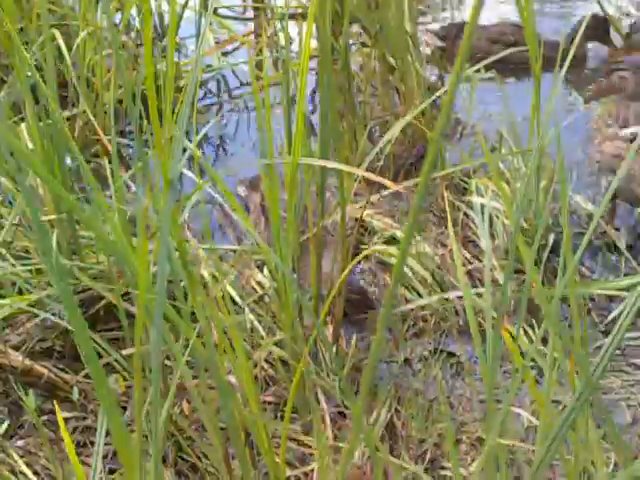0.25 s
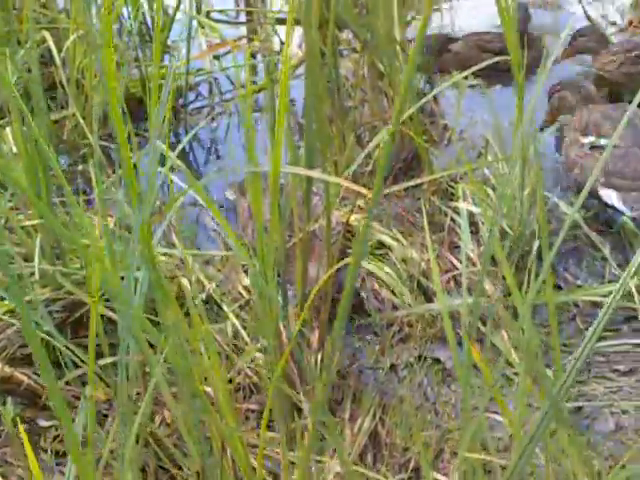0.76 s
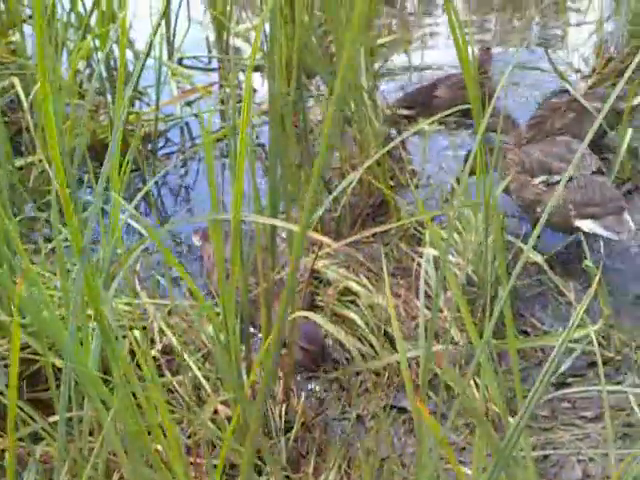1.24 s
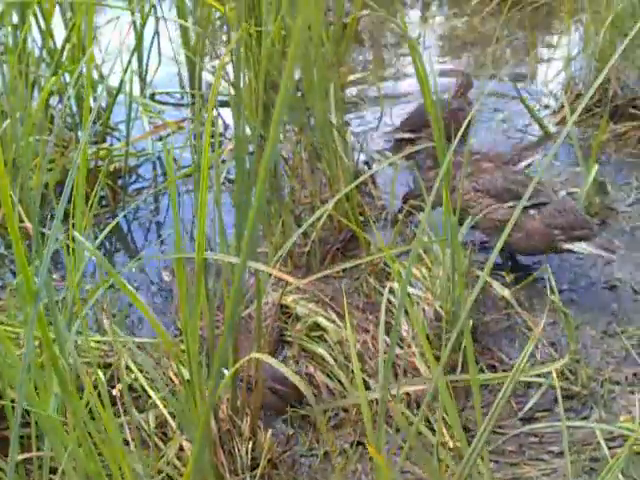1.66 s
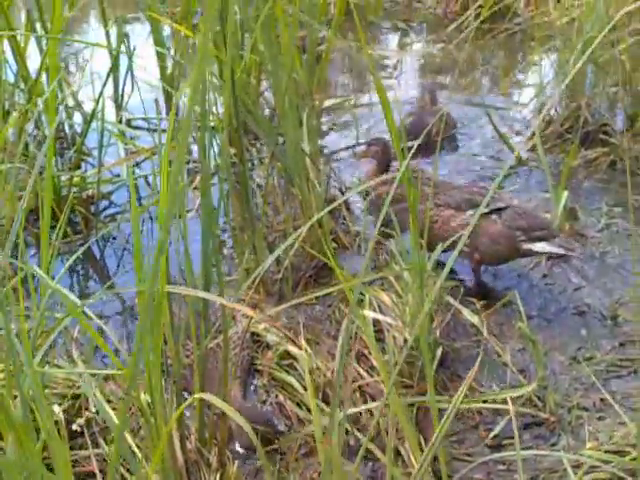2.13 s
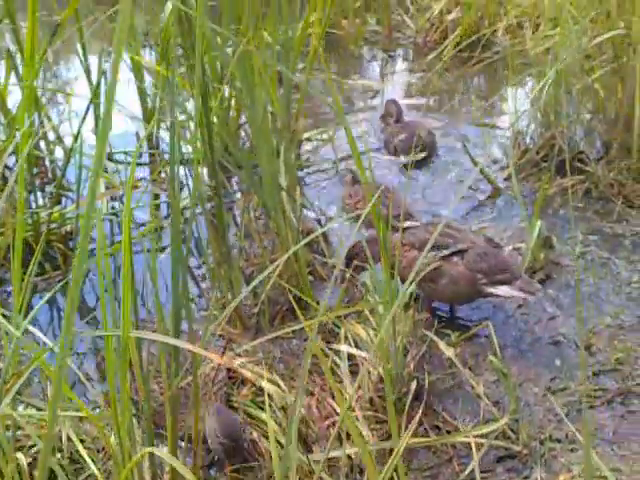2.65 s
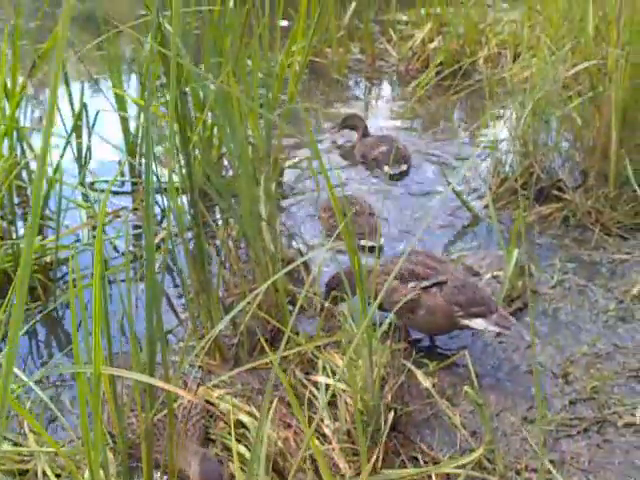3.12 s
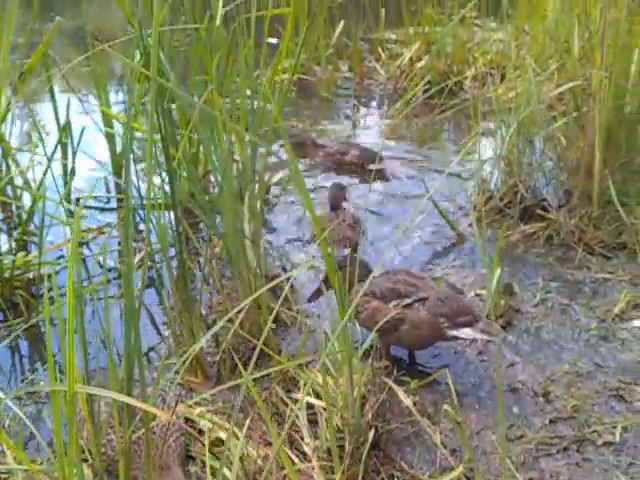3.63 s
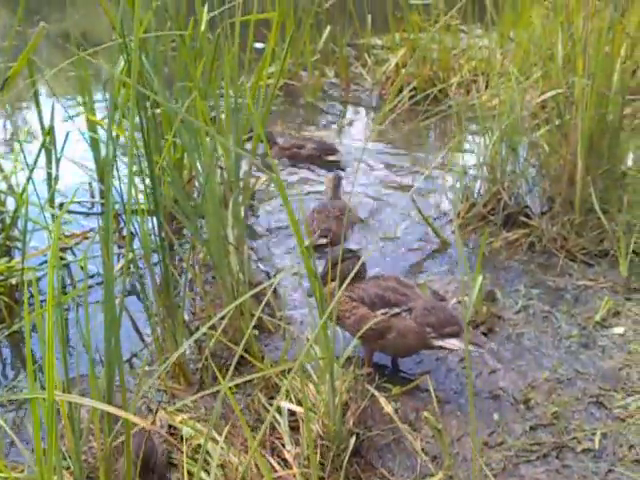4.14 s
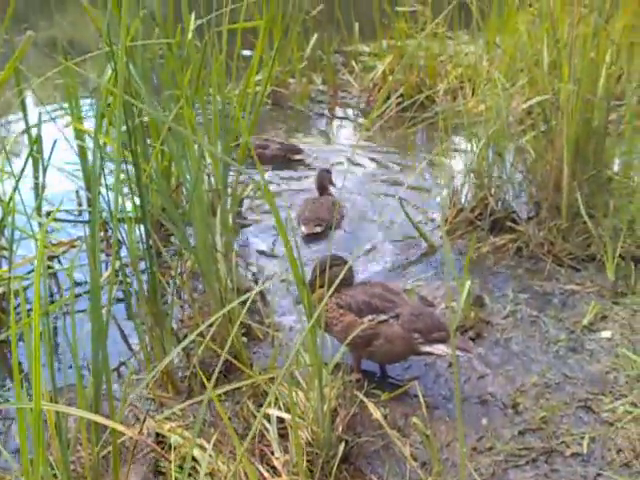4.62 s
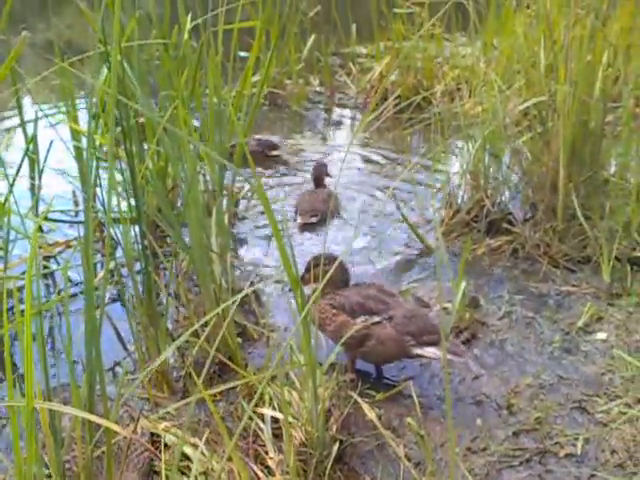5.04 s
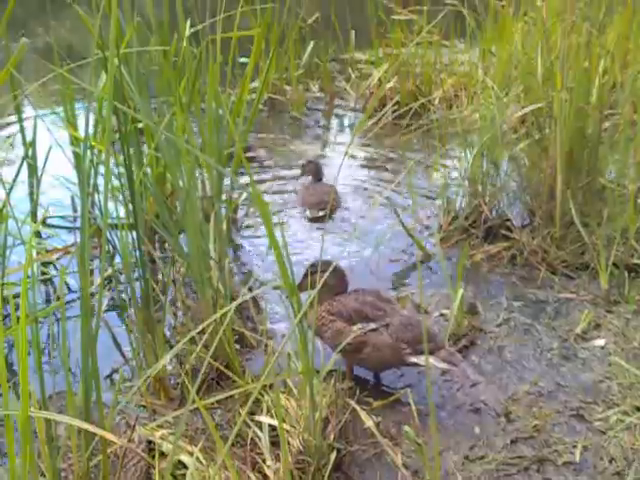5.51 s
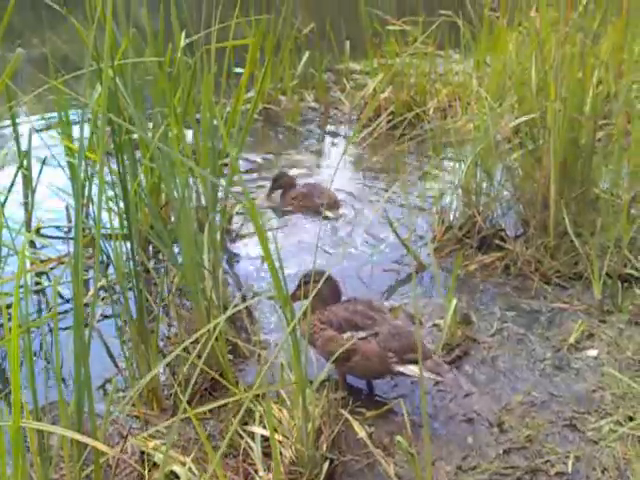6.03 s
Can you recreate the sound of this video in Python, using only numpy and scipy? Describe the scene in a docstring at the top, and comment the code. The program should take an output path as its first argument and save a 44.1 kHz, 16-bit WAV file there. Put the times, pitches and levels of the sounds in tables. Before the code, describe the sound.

Irregular clicks, plops and soft dabbling from feeding ducks, with faint duckling peeps, three sharp snaps, and a low breeze rumble and hiss.

```python
"""Ducks forage in muddy shallows among reeds: bills click and tick, mud smacks and bubbles plop,
each a tiny push that rings briefly. Three times there is a sharp snap. One duck dabbles, stirring up
bubbles and spray. Ducklings peep and an adult clucks softly, using both sides of the voice box.
Light air rumbles on a mono microphone that has its own hiss and a faint electrical buzz."""
import sys
import numpy as np
from scipy import signal
from scipy.fft import rfft, irfft
from scipy.io import wavfile
from scipy.ndimage import uniform_filter1d

SR = 44100
rng = np.random.default_rng(int(sys.argv[2]) if len(sys.argv) > 2 else 0)


def file_out(sig):
    """Save sig as 16-bit WAV at sys.argv[1]."""
    # one column per channel
    cols = np.atleast_2d(sig).T
    # limit, then scale
    lim = np.clip(cols, -1, 1)
    pcm = np.round(lim * 32767).astype(np.int16)
    wavfile.write(sys.argv[1], SR, pcm)


N = 276507
TIME = np.arange(N) / SR

# Levels in a table compare its rows; the functions set the final loudness.
# tone colour of still outdoor air and microphone hiss: f/Hz, level/dB
HISS_SPECTRUM = [(120, -7.5), (200, -8), (329, -11), (361, -16.5), (396, -8), (562, -10), (1200, -10),
                 (1700, -10.5), (1800, -10), (1900, -12.5), (3770, -14.5), (4060, -15), (6800, -21.5),
                 (12500, -16), (15000, -10.5), (16500, -15.5)]
# tones of the electrical buzz: f/Hz, level/dB
BUZZ_TONES = [(200, -75.5), (400, -77), (600, -77.5), (800, -77.5), (1000, -78.5), (1200, -79.5),
              (1400, -78), (2400, -85), (4000, -76.5)]
# tone colour of air flowing over the microphone: f/Hz, level/dB
RUMBLE_SPECTRUM = [(8.8, -19), (15, 2), (42, -1), (199, -16.5), (251, -19.5), (363, -21.5), (400, -27.5),
                   (520, -48), (880, -120)]
# strength of the breeze: t/s, level/dB
BREEZE_LEVELS = [(0, -51), (0.7, -55), (1.5, -53.5), (2.2, -49.5), (2.6, -54), (3.6, -50), (4.7, -52.5),
                 (6.27, -52.5)]
# puffs of air at their peak: t/s, level/dB
AIR_PUFFS = [(0.11, -33), (1.13, -35.5), (2.1, -36), (2.18, -54), (3.2, -43), (3.86, -42), (5.06, -40.5),
             (5.33, -41.5)]
# the adult's clucks: t/s, length/s, starting f/Hz, level/dB
ADULT_CLUCKS = [(2.855, 0.037, 1063, -54.5), (2.911, 0.016, 1280, -54.5), (2.919, 0.03, 1113, -54.5),
                (2.954, 0.052, 1067, -55.5), (3.559, 0.023, 1045, -56.5), (3.739, .03, 1088, -53.5),
                (3.771, 0.038, 1026, -59), (3.843, 0.034, 1015, -57)]
# duckling peeps: t/s, length/s, starting f/Hz, level/dB, second voice against the first/dB
DUCKLING_PEEPS = [(.225, 0.035, 2140, -67, -12), (0.517, .075, 2065, -66, -5),
                  (0.823, .035, 2100, -68, -10), (1.191, .033, 2170, -57, -14),
                  (1.508, 0.024, 2010, -54.5, -4), (1.526, .05, 2183, -52, -23),
                  (1.749, .072, 1594, -52, -8), (1.957, 0.025, 2200, -62, -12),
                  (1.985, .028, 2115, -57, -10), (2.236, .09, 2210, -61.5, -18),
                  (5.184, .04, 2300, -65, -8), (5.45, .045, 2300, -57.5, -4), (5.729, .038, 2440, -60, -13),
                  (6.013, .034, 2350, -57, -3), (6.04, 0.044, 2160, -59, -14)]
# spells of dabbling: t/s, length/s, splash level/dB, spray level/dB
DABBLING_SPELLS = [(0.343, 0.079, -63, -68), (1.467, 0.21, -64, -63), (2.45, 0.032, -66, -61),
                   (2.87, 0.21, -65, -63), (3.41, .11, -63, -59.5), (3.544, 0.018, -55.5, -57),
                   (3.74, 0.12, -57, -61.5), (3.944, 0.22, -54.8, -62), (4.512, .06, -62, -60.5)]
# tone colour of the splashing: f/Hz, level/dB
SPLASH_SPECTRUM = [(410, -31), (700, 5), (933, 5.5), (1130, -1), (1240, 0.5), (2170, 5.5), (3030, 5.5),
                   (6000, -6), (7800, -21), (13200, -120)]
# bubbles that plop as a bill lifts: t/s, level/dB, ringing f/Hz
BUBBLE_PLOPS = [(0.1186, -19, 3080), (0.159, -32, 2780), (0.7058, -29, 2700), (1.166, -31, 2950),
                (1.4346, -25, 1220), (1.55, -26.5, 2910), (1.626, -25, 3230), (1.7688, -23, 2850),
                (1.9991, -28, 1340), (2.4029, -15.5, 2680), (2.4088, -18.5, 3240), (3.147, -29, 2640),
                (4.1517, -28, 4400)]
# wet smacks of mud: t/s, level/dB, ringing f/Hz, q (higher rings longer), decay/ms
MUD_SMACKS = [(0.238, -30.5, 5000, 2.4, 22), (0.9345, -34, 4000, 1, 14), (1.382, -25, 4930, 1, 20),
              (1.552, -30, 12000, 1.6, 13), (1.62, -17, 1540, 1.2, 21), (1.691, -30, 9500, 1.3, 13),
              (2.3934, -25.5, 12000, 1.6, 13), (2.3976, -20, 1080, 8.6, 20), (2.4914, -20.8, 4180, 4.5, 16),
              (3.0939, -10, 7350, 5.8, 9.4), (3.098, -19, 7500, 1.6, 76), (3.5555, -25, 7200, 3.7, 12),
              (4.1045, -19, 2680, 16, 31), (4.527, -17, 1500, 1.4, 24), (4.542, -12.5, 4000, 8.3, 6.8)]
# ringing tones of each snap: f/Hz, width before broadening/Hz, level/dB
THIN_SNAP_TONES = [(3820, 370, 1), (6900, 700, -2), (7720, 590, -5), (9500, 610, -6.5), (11100, 230, -23),
                   (13600, 260, -27), (14200, 370, -21), (14900, 260, -5)]
WOODY_SNAP_TONES = [(1306, 100, 7), (2170, 370, 2), (3830, 220, 5), (5010, 240, -1), (5730, 87, 7.5),
                    (7350, 660, 1), (9900, 550, -4.5), (12200, 450, -5.5), (14200, 580, -5)]
BRIGHT_SNAP_TONES = [(2380, 140, 5.5), (4500, 230, 3.5), (5830, 300, 0.5), (8100, 980, 1.5),
                     (10400, 350, 4), (12700, 570, 2), (13700, 330, -16), (14400, 290, 0.5)]
# the thin, woody and bright snap in turn: t/s, level/dB, smear (0 to 1)
SHARP_SNAPS = [(3.0768, -2, 0.34), (4.3402, 0, 0.4), (5.8257, 4.5, 0.66)]
# dry bill clicks: t/s, level/dB, ringing f/Hz, q, treble cut f/Hz
DRY_CLICKS = [(0.1218, -21, 3900, 6.5, 2600), (0.1928, -29.5, 3800, 6, 6000),
              (1.2562, -25.5, 1500, 2, 2700), (1.644, -21, 3050, 6, 5000), (1.6573, -26, 1100, 6.3, 4500),
              (1.6832, -26, 3770, 7, 3000), (1.83, -26, 3230, 2.5, 3000), (1.8836, -22.5, 2830, 3.9, 4000),
              (1.9415, -16.5, 6300, 4.8, 5470), (1.942, -22.5, 2600, 1, 4000),
              (1.944, -25.5, 1160, 5, 9000), (2.402, -17, 1600, 1.9, 2100), (2.4623, -20.5, 1570, .9, 3000),
              (2.7371, -23, 3100, 2.1, 3000), (2.805, -27, 2520, 3.3, 4000),
              (2.8656, -24.5, 1300, 1.8, 4030), (2.9221, -26.5, 2900, 7, 3000),
              (2.9859, -19, 2900, 6, 4000), (3.044, -26.5, 6160, 2, 5000), (3.0794, -9, 3740, 2.1, 10000),
              (3.0839, -10.5, 1690, 4.8, 8000), (3.0838, -20.5, 965, 0.74, 1500),
              (3.2121, -23.5, 2140, 1, 5070), (3.6278, -26, 3160, 1.1, 3030), (3.7489, -21, 1110, .8, 4020),
              (3.8968, -25, 1100, 1.1, 6500), (4.26, -16.5, 2320, 0.84, 4000), (4.3441, -21, 620, .7, 1800),
              (4.5482, -20, 2660, 2, 4000), (4.5908, -30, 4930, 1.8, 4000), (4.629, -30, 3740, 2, 3000),
              (4.6854, -20, 2630, 2, 3000), (4.744, -28, 1100, 1, 5000), (5.9706, -32, 3180, 4, 3000)]


def from_db(db):
    """Turn decibels into a factor to multiply by."""
    return 10 ** (np.asarray(db) / 20)


def rms_one(x):
    """Scale a steady sound to an average power of 1."""
    return x / np.sqrt(np.mean(x ** 2) + 1e-20)


def energy_one(x):
    """Scale a short sound to a total energy of 1."""
    return x / np.sqrt(np.sum(x ** 2) + 1e-20)


def add(track, s, sound):
    """Mix a sound in, starting at s seconds."""
    at = int(s * SR)
    track[at:at + len(sound)] += sound[:N - at]


def keep_band(x, hz, side, order=1):
    """Keep the "low" or "high" side of hz; a higher order cuts more steeply."""
    return signal.sosfilt(signal.butter(order, min(hz, .45 * SR), side, fs=SR, output="sos"), x)


def coloured(x, spectrum):
    """Give a sound a tone colour that fades beyond the table's ends; power 1."""
    hz, db = np.transpose(spectrum)
    f = np.maximum(np.arange(N // 2 + 1) * SR / N, 1)
    gain = from_db(np.interp(np.log(f), np.log(hz), db))
    fade = np.minimum(1, np.minimum(f / hz[0], hz[-1] / f)) ** 2
    return rms_one(irfft(rfft(x) * gain * fade, N))


def resonance(x, hz, width_hz):
    """Ring at one pitch; a narrower width rings longer."""
    r = np.exp(-np.pi * width_hz / SR)
    feedback = [1, -2 * r * np.cos(2 * np.pi * hz / SR), r * r]
    return signal.lfilter(np.array([1, 0, -1]) * (1 - r * r) / 2, feedback, x + 1e-18)


def drift(per_s):
    """Slow random wandering, about 1 in size."""
    points = rng.standard_normal(256)
    return rms_one(np.interp(TIME * per_s, np.arange(len(points)), points))


def click(hz, q, top_hz, decay_ms):
    """One sudden push and a dying crowd of tiny ones make a bill or pocket ring; energy 1."""
    ms = np.arange(4096) * 1000 / SR
    push = 0.74 * energy_one(rng.standard_normal(len(ms)) * from_db(-60 * ms / decay_ms))
    push[0] += 1
    angle = 2 * np.pi * hz / SR
    damping = np.sin(angle) / (2 * q)
    ring = signal.lfilter([1, -2, 1], [1 + damping, -2 * np.cos(angle), 1 - damping], push)
    ring = keep_band(ring, hz, "high")
    return energy_one(keep_band(ring, top_hz, "low", order=2))


def hiss_and_buzz(hiss_db=-56):
    """Air and microphone hiss evenly over a thin electrical buzz."""
    hiss = from_db(hiss_db) * coloured(rng.standard_normal(N), HISS_SPECTRUM)
    buzz = sum(from_db(db) * np.sqrt(2) * np.sin(2 * np.pi * (hz * TIME + rng.random()))
               for hz, db in BUZZ_TONES)
    return hiss + buzz


def wind(puff_db=-2, puff_width_s=0.0095, swing_db=1.5, murmur_db=-52.5, split_hz=130):
    """A restless breeze and a few puffs thump in the deep bass, under a steady, higher murmur."""
    flow = coloured(rng.standard_normal(N), RUMBLE_SPECTRUM)
    even_flow = flow / np.sqrt(uniform_filter1d(flow ** 2, size=4000) + 1e-6)
    breeze_db = np.interp(TIME, *np.transpose(BREEZE_LEVELS))
    breeze = from_db(breeze_db + swing_db * drift(per_s=12))
    puffs = sum(from_db(db + puff_db) * np.exp(-((TIME - s) / puff_width_s) ** 2 / 2)
                for s, db in AIR_PUFFS)
    thumps = keep_band(np.hypot(breeze, puffs) * even_flow, split_hz, "low", order=3)
    return thumps + from_db(murmur_db) * keep_band(flow, split_hz, "high", order=3)


def reed_echo(x, echo_db, fade_s, dull_hz=8000):
    """Stems and bank scatter a short echo that drops 60 dB in fade_s."""
    t = np.arange(SR // 4) / SR
    echoes = rng.standard_normal(len(t)) * from_db(-60 * t / fade_s) * np.minimum(t / 0.0029, 1)
    echoes = energy_one(keep_band(echoes, dull_hz, "low"))
    return from_db(echo_db) * signal.fftconvolve(x, echoes)[:N]


def duck_note(length, start_hz, glide, second_db, waver, flutter, second_ratio=1.11, lag_s=0.00198):
    """The two sides of the voice box sing a short slide, one a little higher and later."""
    progress = np.linspace(0, 1, int(length * SR))
    pitch = start_hz * (1 + glide * progress ** 0.758)   # slides fastest at first
    sides = []
    for ratio in (1, second_ratio):
        wobbles = rms_one(keep_band(rng.standard_normal((2, 8192)), 320, "low", order=2))
        shake, tremble = wobbles[:, -len(progress):]
        phase = 2 * np.pi * np.cumsum(ratio * pitch * (1 + waver * shake)) / SR
        swell = np.abs(np.sin(np.pi * progress)) ** 0.55 * (1 + flutter * tremble)
        tone = np.sin(phase) + from_db(-19) * np.sin(2 * phase)
        sides.append(np.sqrt(2) * swell * tone)
    lag = int(lag_s * SR)
    return np.pad(sides[0], (0, lag)) + from_db(second_db) * np.pad(sides[1], (lag, 0))


def clucks(gain_db=-1.5):
    """The adult's clucks are low and hoarse, and rise a little."""
    out = np.zeros(N)
    for s, length, hz, db in ADULT_CLUCKS:
        cluck = duck_note(length, hz, glide=0.086, second_db=-11, waver=.04, flutter=.6)
        add(out, s, from_db(db + gain_db) * cluck)
    return out


def peeps(gain_db=-1.2):
    """Duckling peeps slide down; strong ones are nearly clean, faint ones hoarse."""
    out = np.zeros(N)
    for s, length, hz, db, second_db in DUCKLING_PEEPS:
        hoarse = np.interp(db, [-62, -51], [1, 0])
        peep = duck_note(length, hz, glide=-0.22, second_db=second_db,
                         waver=.011 + .018 * hoarse, flutter=.35 + .25 * hoarse)
        add(out, s, from_db(db + gain_db) * peep)
    return out


def stirring(rise_s=0.13, fall_s=0.067, swing_db=1.1):
    """Strength of splash and spray: each spell swells, holds and fades over a slight lapping."""
    lapping = from_db(swing_db * drift(per_s=3.14))
    splash, spray = from_db(-68.5) * lapping, from_db(-67) * lapping
    for s, length, splash_db, spray_db in DABBLING_SPELLS:
        swell = np.interp(TIME, [s - rise_s, s, s + length, s + length + fall_s], [0, 1, 1, 0])
        splash = np.hypot(splash, from_db(splash_db) * swell)
        spray = np.hypot(spray, from_db(spray_db) * swell)
    return splash, spray


def droplets(per_s, low_hz, high_hz, q, spread_db, pitch_count=16):
    """Tiny bubbles and drops appear at random, each ringing for a few cycles."""
    sizes = from_db(spread_db * np.minimum(rng.exponential(1, N), 4)) * rng.choice([-1, 1], N)
    pushes = sizes * (rng.random(N) < per_s / SR)
    choice = rng.integers(0, pitch_count, N)
    pitches = np.geomspace(low_hz, high_hz, pitch_count)
    return rms_one(sum(resonance(pushes * (choice == k), hz, hz / q) for k, hz in enumerate(pitches)))


def ticks(splash, per_s=24, middle_hz=3200, spread_octaves=0.27, gain_db=24.5):
    """Sieving bills tick faintly at random, as strongly as the water is stirred."""
    out = np.zeros(N)
    times = np.cumsum(rng.exponential(1, 256)) / per_s
    chance = np.clip(rng.standard_normal((256, 2)), -2, 2)
    for s, (extra_db, pitch_step) in zip(times, chance):
        if s < TIME[-1]:
            hz = middle_hz * 2 ** (spread_octaves * pitch_step)
            strength = splash[int(s * SR)] * from_db(gain_db + extra_db)
            add(out, s, strength * click(hz, q=3.2, top_hz=hz, decay_ms=16.5))
    return out


def dabbling(splash_db=-0.5, spray_db=-1.5, spray_top_hz=12000):
    """A bill sieves the water: bubbles and ticks in the middle range, fine spray above."""
    splash, spray = stirring()
    bubbles = droplets(per_s=1500, low_hz=1000, high_hz=5000, q=7, spread_db=3.3)
    drops = droplets(per_s=2200, low_hz=4500, high_hz=15000, q=4, spread_db=3.2)
    bubbling = from_db(splash_db) * splash * coloured(bubbles, SPLASH_SPECTRUM)
    spraying = from_db(spray_db) * spray * rms_one(keep_band(drops, spray_top_hz, "low"))
    return bubbling + ticks(splash) + spraying


def plops():
    """Bubbles ring with a clear pitch as a bill lifts."""
    out = np.zeros(N)
    for s, db, hz in BUBBLE_PLOPS:
        add(out, s, from_db(db) * click(hz, q=11.5, top_hz=0.96 * hz, decay_ms=6.6))
    return out


def smacks():
    """Pockets in the wet mud ring with a bright smack."""
    out = np.zeros(N)
    for s, db, hz, q, decay_ms in MUD_SMACKS:
        add(out, s, from_db(db) * click(hz, q, top_hz=16000, decay_ms=decay_ms))
    return out


def smeared_push(smear):
    """Tiny echoes spread one push out in time without changing its tone colour."""
    push = signal.unit_impulse(2048)
    for lag in rng.integers(3, 14, 4):
        gap = np.zeros(lag - 1)
        push = signal.lfilter(np.r_[smear, gap, 1], np.r_[1, gap, smear], push)
    return push


def snaps(broadening=1.9, bass_cut_hz=950):
    """A hard break sets several short, overlapping tones ringing at once."""
    out = np.zeros(N)
    tone_sets = (THIN_SNAP_TONES, WOODY_SNAP_TONES, BRIGHT_SNAP_TONES)
    for (s, db, smear), tones in zip(SHARP_SNAPS, tone_sets):
        push = smeared_push(smear)
        ring = sum((-1) ** k * from_db(tone_db) * resonance(push, hz, broadening * width)
                   for k, (hz, width, tone_db) in enumerate(tones))
        add(out, s, from_db(db) * energy_one(keep_band(ring, bass_cut_hz, "high", order=3)))
    return out


def bill_clicks(usual_db=-27, usual_decay_ms=16.5, halving_db=22):
    """Bills click dryly; harder clicks die away faster and so sound crisper."""
    out = np.zeros(N)
    for s, db, hz, q, top_hz in DRY_CLICKS:
        decay_ms = usual_decay_ms * 2 ** ((usual_db - db) / halving_db)
        add(out, s, from_db(db) * click(hz, q, top_hz, decay_ms))
    return out


def scene():
    """Ducks, echoes, wind and hiss reach one microphone that feeds both channels."""
    small = bill_clicks() + smacks() + plops() + peeps() + clucks() + dabbling()
    small += resonance(small, hz=14500, width_hz=2600)   # the microphone's opening rings, adding sparkle
    sharp = snaps()
    small += reed_echo(small, echo_db=-8, fade_s=0.044)
    sharp += reed_echo(sharp, echo_db=-20.5, fade_s=0.065)
    mono = small + sharp + wind() + hiss_and_buzz()
    return np.stack([mono, mono])


def record(dry):
    """The highest treble, above 15900 Hz, is cut steeply."""
    return signal.sosfilt(signal.ellip(12, .1, 80, 15900, fs=SR, output="sos"), dry)


dry = scene()
out = record(dry)
file_out(out)
```